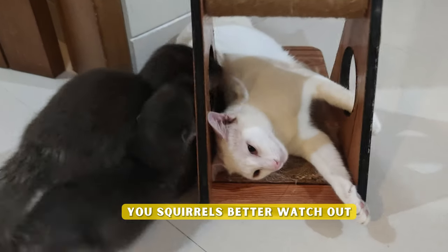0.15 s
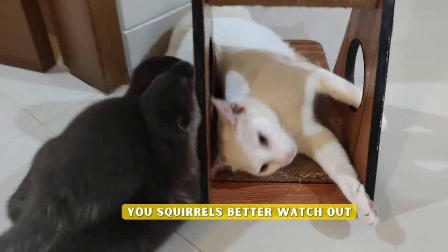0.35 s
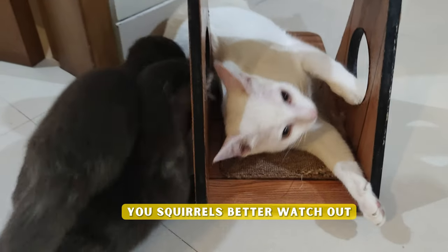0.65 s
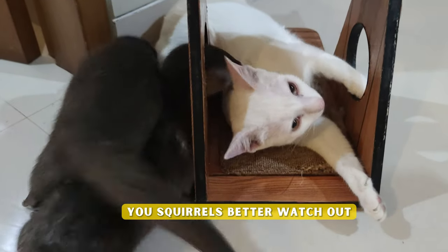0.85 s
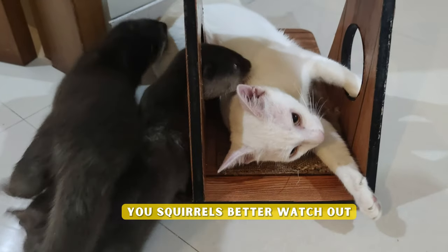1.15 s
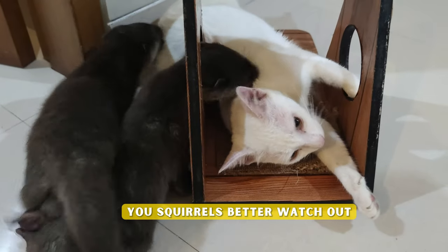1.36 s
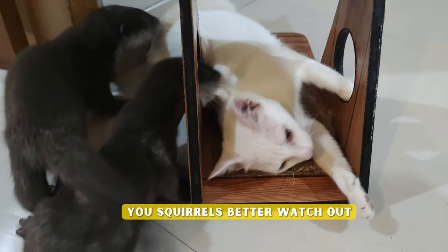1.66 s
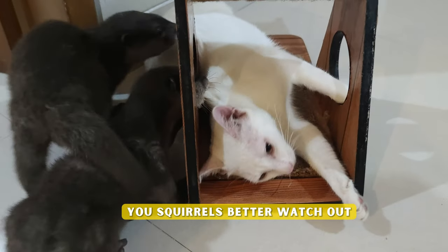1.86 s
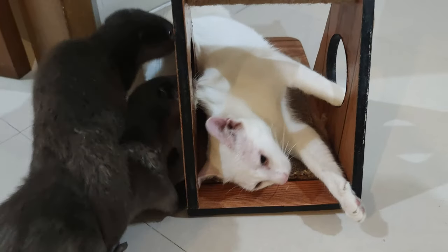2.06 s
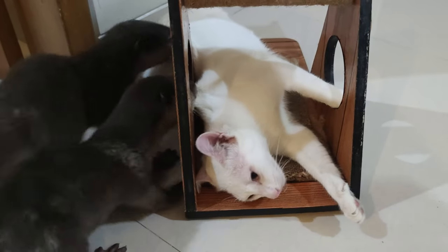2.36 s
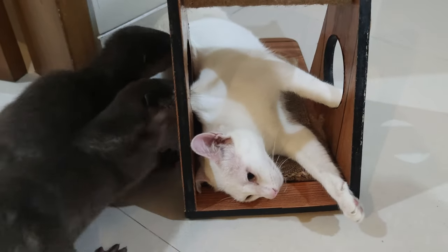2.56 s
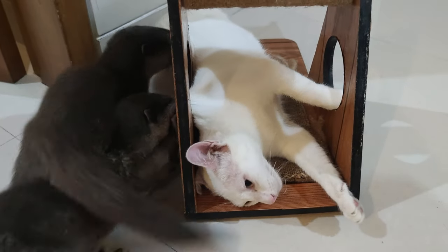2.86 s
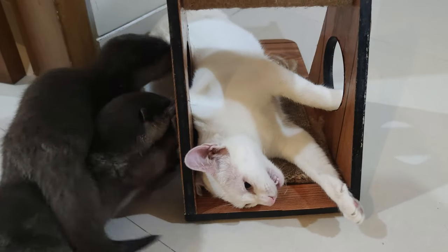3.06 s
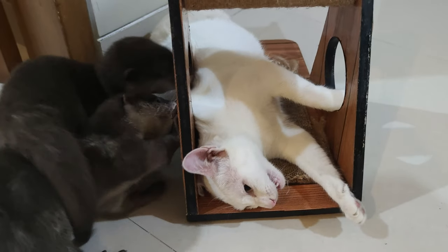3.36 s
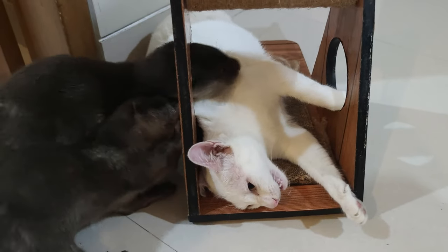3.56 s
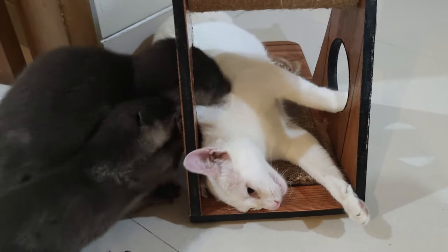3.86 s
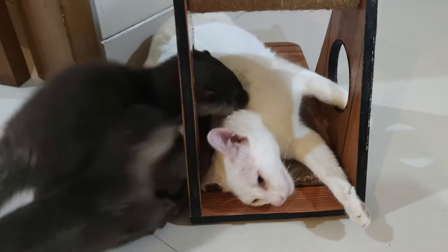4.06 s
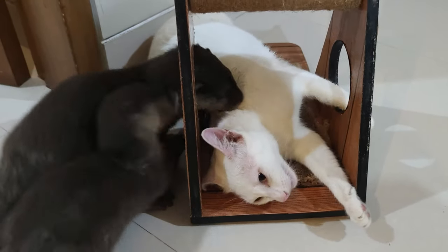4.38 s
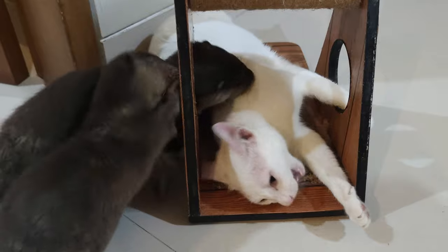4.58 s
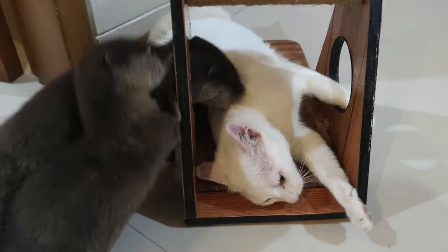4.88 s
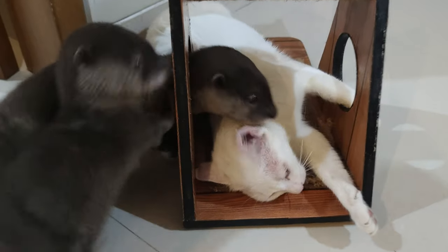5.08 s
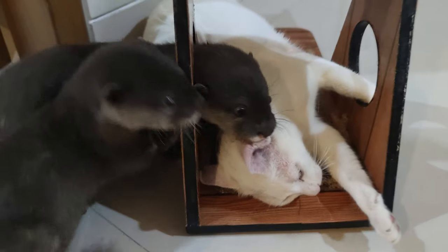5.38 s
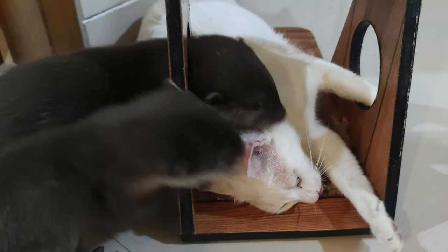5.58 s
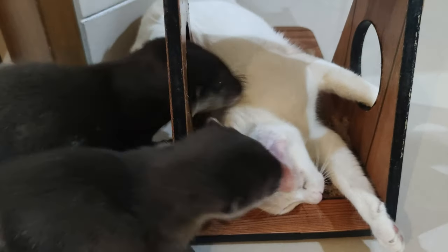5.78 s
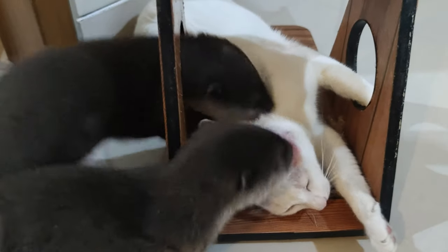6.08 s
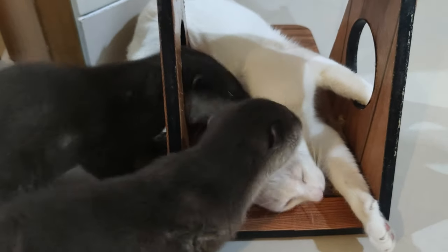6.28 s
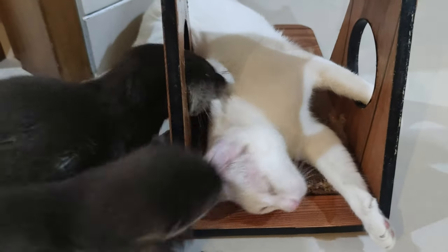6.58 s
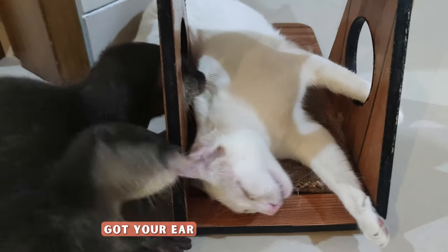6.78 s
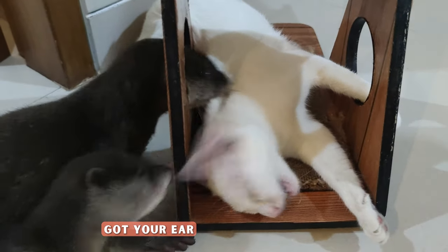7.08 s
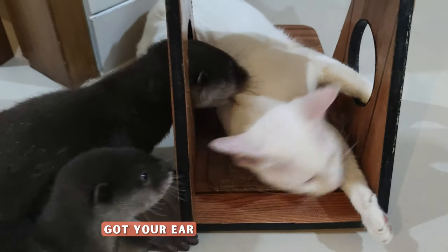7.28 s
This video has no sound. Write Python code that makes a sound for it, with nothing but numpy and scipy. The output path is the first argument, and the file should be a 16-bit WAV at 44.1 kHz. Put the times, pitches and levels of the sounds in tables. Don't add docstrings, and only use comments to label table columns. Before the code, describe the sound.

In a hard tiled room, heard by a phone a metre or two away, soft household air, low hum and a faint throbbing insect shimmer near 7.4 kHz run throughout. A faint otter chirp opens at 0 s, another at 0.2, then a sharp one at 1.3. From 1.0 to 2.0 come nasal, fluttering wheezes, a dry sniff, claw ticks and woody squeaks. Chirps at 2.2 and 2.4 surround a short raspy grunt at 2.3; another follows at 2.85. Scuffing and hollow bumps fill 3.0 to 3.4. Falling whistles of about 50 milliseconds repeat at 3.9, 4.3, 4.6, 4.9, 5.8, 6.15 (loudest) and 6.65, with little mouth pops, some airy puffs, and a ringing room tail. Chirps lean right. From 7.0 to the end at 7.4, a vigorous scuffle of rubbing, squeaking panels, ticks and low wooden thumps moves leftward.

```python
import sys
import numpy as np
from scipy import signal
from scipy.fft import rfft, irfft
from scipy.io import wavfile
from scipy.ndimage import uniform_filter1d

SR = 44100
rng = np.random.default_rng(int(sys.argv[2]) if len(sys.argv) > 2 else 0)


def gain_from_decibels(decibels):
    exponent = np.asarray(decibels, float) / 20
    return 10 ** exponent


def master(y):
    cut = np.clip(np.atleast_2d(y).T, -1, 1)
    pcm = np.round(cut * 32767)
    wavfile.write(sys.argv[1], SR, pcm.astype(np.int16))


N = 328104
T = np.arange(N) / SR
F = np.arange(N // 2 + 1) * SR / N + 1e-3

# (time [s], level [dB])
RESTLESS = [(0.0, -66.5), (.91, -70), (1.2, -104), (1.45, -57), (1.64, -54.5), (1.9, -53.5), (2.2, -58.5),
            (2.42, -51.5), (2.7, -59), (2.94, -66), (3.27, -56.5), (3.85, -61.5), (4.14, -60), (4.93, -61),
            (5.6, -61), (7.1, -61), (7.29, -49), (7.44, -64)]


def level(x, db):
    return x * gain_from_decibels(db) / np.sqrt(np.mean(x ** 2))


def on_log(hz, table):
    table_hz, values = np.transpose(table)
    return np.interp(np.log(hz), np.log(table_hz), values)


def response(hz, width, order):
    return 1 / (1 + 1j * (F - hz ** 2 / F) / width) ** order


def band(x, hz, width, order=2):
    return irfft(rfft(x) * response(hz, width, order), N)


def walk(rate):
    hold = int(SR / rate)
    steps = np.repeat(rng.standard_normal(N // hold + 1), hold)
    return 1.5 * uniform_filter1d(uniform_filter1d(steps, hold), hold)[:N]


def grains(spike_db, density):
    size_db = spike_db * np.minimum(rng.exponential(size=N), 3.5)
    return rng.standard_normal(N) * (rng.random(N) < density / SR) * gain_from_decibels(size_db)


def turn(hz):
    return 2 * np.pi * np.cumsum(hz) / SR


def narrow(hz, width):
    pole = np.exp(-np.pi * width / SR)
    slow = signal.lfilter([1], np.poly([pole] * 2), rng.standard_normal((2, N)))
    return level(np.real((slow[0] + 1j * slow[1]) * np.exp(1j * turn(hz))), 0)


def bursts(rows, db, attack, release):
    power = np.zeros(N)
    for (start, length, *_), gain_db in zip(rows, db):
        first = int(start * SR)
        t = T[first:int((start + length + 8 * release) * SR)] - start
        rise = np.clip(t / (attack * length), 0, 1)
        fall = np.exp(-np.maximum(t - length, 0) / release)
        power[first:first + len(t)] += (gain_from_decibels(gain_db) * rise * fall) ** 2
    return np.sqrt(power)


def chirps():
    # (start [s], length [s], peak [dB], where the peak falls [0-1], swell up to the peak [dB])
    calls = [(0.0, 0.02, -55, 1, -15), (0.165, 0.074, -46.5, 0.68, 2.5), (1.308, 0.056, -34, 0.91, 15),
             (2.165, 0.036, -41, 0.95, 7), (2.4, .048, -33.5, 0.74, 17.5), (2.852, 0.04, -40, 0.73, 7.5),
             (3.926, 0.042, -37, 0.66, 15), (4.291, 0.057, -36, 0.47, 5), (4.6, .038, -35.5, 0.66, 4.5),
             (4.942, 0.035, -35, 0.79, 7), (5.8192, 0.045, -34, 0.86, 10), (6.1431, 0.058, -29.5, 0.89, 9),
             (6.637, 0.042, -33.5, 0.83, 9.5)]
    # (start [Hz], drift [Hz], end [Hz], suddenness of the plunge [power], snap [Hz])
    glides = [(6500, 0, 4300, 2, 0), (6270, 4290, 5240, 1.6, 0), (6630, 1040, 5150, 4.1, 0),
              (6170, 60, 5600, 7, 0), (6230, 110, 4300, 3, 200), (6280, -550, 5700, 5, 1000),
              (6880, -2050, 3800, 8, 0), (6530, 2580, 3620, 2.9, 0), (6080, -900, 4500, 5, 0),
              (5720, -1140, 3330, 4.2, 100), (6420, -1210, 4250, 8.6, 400), (6130, 1750, 4700, 2, 650),
              (6490, -1700, 3560, 6.1, 200)]
    # (octave [dB], room share [dB], flare as the beam crosses the phone [dB])
    heads = [(-53, 1, 13), (-74.5, -0.5, 7), (-62, 0, 7.5), (-57, -0.5, 0.5), (-52.5, 7, -10), (-61, 5, 3),
             (-53.5, 4.5, 8), (-56, -7.5, -2), (-66, -1, -3), (-46, 5, 0.5), (-51.5, 1, 6), (-54.5, -5, 2),
             (-46, 3.5, 9)]
    fades = [17, 37, 26, 26, 27, 31, 26, 26, 42, 35, 21, 27, 29]
    octave_rises = [-4, -5, -10, 14, 25, 14, -4, -1, 18, 18, 10, 30, 7.5]
    octave_room = [-3.5, 2, 2.5, 7, -4.5, -2, -1.5, 1, 1, -5.5, -2, 2, -4]
    lags = [12, 11, 11, 10, 10, 10, 10, 12, 9, 11, 1, 1, 2]
    left_levels = [-8, -7, -8, -7, -7, -11, -10, -6, -8, -7, -7, -9, -9]
    # (time [s], level [dB], half width [s])
    swells = [(.17, 9, .004), (.199, -8, .003), (.206, 10, .003), (4.961, -10, .002), (1.345, 2.5, .006),
              (2.873, 7, 0.0025), (3.935, 10, 0.0024), (3.959, 2, .002), (3.965, 9, .002), (4.623, 2, .004),
              (5.84, 5.5, .006), (5.851, -9, .003), (6.175, -4, 0.0019), (6.184, 3, 0.0029),
              (6.19, -8, 0.0017)]
    attack_s, release_s, snap_s, flare_s = 0.0016, 0.0015, 0.003, 0.0045

    which = np.searchsorted([call[0] for call in calls[1:]], T + .005)
    start, length, peak_db, place, swell_db = np.array(calls)[which].T
    first, drift, last, sudden, snap = np.array(glides)[which].T
    octave_db, far_db, flare_db = np.array(heads)[which].T

    u = np.clip((T - start) / length, 0, 1)
    plunge = (first + drift - last) * u ** sudden
    hz = first + drift * u - plunge - snap * np.exp((u - 1) * length / snap_s)
    phase, shake = turn(hz), walk(150)

    rise_db = swell_db * np.maximum(1 - u / place, 0) ** 1.16
    db = peak_db - rise_db - np.array(fades)[which] * np.maximum(u - place, 0)
    waver_db = np.zeros(N)
    for s, gain_db, half in swells:
        near = slice(int((s - 3 * half) * SR), int((s + 3 * half) * SR))
        waver_db[near] += gain_db * np.exp(-((T[near] - s) / half) ** 2)
    beam_db = flare_db * np.exp(-((u - place) * length / flare_s) ** 2)
    gate = np.clip(np.minimum((T - start) / attack_s, (start + length - T) / release_s), 0, 1)

    octave_db = octave_db + np.array(octave_rises)[which] * np.minimum(u - .75, 0) + 3.5 * shake
    octave = gain_from_decibels(octave_db) * np.sin(2 * phase)
    tone = gain_from_decibels(db + waver_db + 1.5 * shake + beam_db) * np.sin(phase)
    whistle = np.sqrt(2) * gate * (tone + octave)
    late = whistle[np.maximum(np.arange(N) - np.array(lags)[which], 0)]

    usual_db = peak_db - swell_db / 2
    below, above = np.log2(np.minimum(hz / 5000, 1)), np.log2(np.maximum(hz / 5000, 1))
    steady_db = usual_db + 0.77 * (db - usual_db) + 3.4 * below - 2.1 * above
    steady = gain_from_decibels(steady_db) * np.sin(phase) + gain_from_decibels(np.array(octave_room)[which]) * octave
    far = gain_from_decibels(far_db) * np.sqrt(2) * gate * steady

    left = gain_from_decibels(np.array(left_levels)[which]) * (whistle + .3 * np.roll(whistle, 95))
    return left, late, far


def smacks():
    # (time [s], peak [dB], ring [Hz])
    pops = [(0.0186, -70, 1966), (2.207, -65, 1486), (2.899, -61.5, 1470), (3.9651, -59, 2183),
            (4.344, -64.5, 1098), (4.635, -56, 1510), (4.973, -57, 1311), (5.858, -55, 1429),
            (6.1977, -65, 1230), (6.6744, -52, 1417)]
    out, t = np.zeros(N), T[:1500]
    shape = 6 * t / 0.0021 * np.exp(1 - t / 0.0056)
    for (s, db, hz), wet in zip(pops, rng.standard_normal((len(pops), len(t)))):
        ring = np.sin(2 * np.pi * hz * t) + 1.03 * np.sin(2 * np.pi * 1.8 * hz * t)
        i = int(s * SR)
        out[i:i + len(t)] += gain_from_decibels(db) * ring * uniform_filter1d(wet, size=36) * shape
    return out


def insects():
    # (time [s], level [dB])
    loudness = [(0.0, -64.5), (0.5, -65), (1.06, -66), (1.51, -63), (3.09, -64.5), (3.44, -64),
                (3.79, -64.5), (4.08, -64.5), (6.32, -65.5), (7.19, -63), (7.44, -59)]
    # (frequency [Hz], width [Hz], level [dB])
    wing_modes = [(7486, 166, -4), (7260, 160, -9), (7030, 320, -10)]
    top_hz = 7940
    throb = 1 + 0.25 * np.sin(turn(9.7 + 0 * T) + 3.67)
    strokes = throb * (1 + 0.11 * np.sin(turn(51.0 + 0 * T) + 0.27 * walk(8.1)))
    power = sum(np.abs(gain_from_decibels(db) * response(hz, width, order=2)) ** 2 / width for hz, width, db in wing_modes)
    wings = np.sqrt(power) / (1 + (F / top_hz) ** 70)
    song = irfft(rfft(strokes * rng.standard_normal((2, N))) * wings, N)
    pan_db = np.array([[-2.2], [2.2]])
    return level(song, 7.37) * gain_from_decibels(np.interp(T, *np.transpose(loudness)) + pan_db)


def house():
    # (frequency [Hz], level per Hz [dB])
    air_colour = [(12, -37), (19, 12), (32, 1), (74, -4), (150, -9.5), (300, -6.5), (800, -11), (960, -5),
                  (1200, -17.5), (3500, -22.5), (6300, -27), (8300, -28.5), (11000, -25.5), (15700, -27)]
    # (frequency [Hz], likeness [-1 to 1])
    likeness = [(60, 0.27), (130, 0.39), (290, 0.75), (640, 0.057), (1410, -0.32), (3100, 0.21),
                (6820, -0.22), (15000, 0.13)]
    # (time [s], level [dB])
    air_swell = [(0, -1.5), (.9, -1), (1.3, 0), (2.2, 3), (2.9, 0), (3.5, 1.5), (3.75, 0), (4.1, 2),
                 (4.9, 0.5), (5.4, 1), (6, 0.5), (6.8, 1), (7.44, 2)]
    # (frequency [Hz], width [Hz], level [dB])
    hum_tones = [(208.8, 33.5, -71.5), (293.7, 17, -77.5), (558.5, 11, -82)]
    alike = np.clip(on_log(F, likeness), -.9, .95)
    noise = rfft(rng.standard_normal((2, N))) * gain_from_decibels(on_log(F, air_colour))
    mid, side = noise * np.sqrt([1 + alike, 1 - alike])
    air = level(irfft(np.array([mid + side, mid - side]), N), -60.5)
    hum = sum(gain_from_decibels(db + 0.5 * walk(8.1)) * narrow(hz + 0 * T, width) for hz, width, db in hum_tones)
    return air * gain_from_decibels(np.interp(T, *np.transpose(air_swell)) + 0.72 * walk(6.03)) + hum


def shuffle():
    # (start [s], length [s], level [dB])
    shifts = [(0.018, 0.015, -59), (0.44, 0.096, -64.5), (0.741, 0.028, -60), (1.018, 0.27, -58),
              (1.457, 1, -72), (2.27, 0.3, -60), (2.73, 0.5, -63.5), (3.11, 0.32, -61.5),
              (3.453, 0.36, -64), (4.096, 0.15, -61), (4.34, 0.016, -62), (4.593, 0.17, -64.5),
              (4.97, 0.23, -59), (5.699, 0.047, -56.5), (5.895, 0.14, -62.5), (6.195, 0.056, -60.5),
              (6.697, 0.2, -60), (6.9, 0.81, -59.5), (7.166, 0.039, -54), (7.247, 0.15, -46.5)]
    mid, side = (level(band(grains(2.0, 5000), 299, 1430, order=3), 0) for _ in range(2))
    steady = gain_from_decibels(np.interp(T, *np.transpose(RESTLESS)) - 5)
    weight = np.hypot(steady, bursts(shifts, np.transpose(shifts)[2], attack=0.22, release=0.03))
    return gain_from_decibels(-4.5) * weight * (mid + 0.54 * side * np.array([[1], [-1]]))


def rubs():
    # (start [s], length [s], level [dB], start pitch [Hz], end pitch [Hz])
    catches = [(1.467, 0.046, -58, 1776, 1540), (1.587, 0.032, -50, 1910, 1780),
               (2.203, 0.027, -52, 1507, 1462), (7.153, 0.069, -68, 2140, 2200),
               (7.398, 0.023, -54.5, 484, 452), (0.027, 0.027, -59, 1810, 1870),
               (2.021, 0.039, -53, 1435, 1400), (7.142, 0.011, -53.5, 5160, 5000),
               (7.263, 0.061, -54, 4700, 4800), (7.317, 0.038, -55, 4830, 4700),
               (1.064, 0.022, -62, 2750, 2700), (1.107, 0.033, -57, 2200, 2300),
               (1.21, 0.046, -66, 2380, 2520), (3.085, 0.013, -55, 2590, 2490),
               (3.135, 0.024, -57, 2670, 2700), (3.206, 0.077, -58, 3920, 3930),
               (3.213, 0.032, -51.5, 2830, 2850), (3.274, 0.036, -52, 2950, 2880),
               (3.281, 0.02, -58, 4430, 4330), (6.987, 0.084, -62, 2150, 2290),
               (7.115, 0.027, -53.5, 2990, 2880), (7.111, 0.022, -61, 2140, 2120),
               (7.171, 0.035, -53.5, 558, 622), (7.209, 0.016, -58, 940, 910),
               (7.234, 0.011, -54, 1240, 1200), (7.236, 0.016, -57, 2125, 2140),
               (7.258, 0.034, -52, 632, 903), (7.262, 0.018, -42.5, 2080, 2310),
               (7.28, 0.033, -55, 1410, 1320), (7.294, .022, -43, 2256, 2240),
               (7.297, 0.018, -53, 3450, 3480), (7.325, 0.036, -51, 2126, 2250),
               (7.33, 0.074, -52.5, 560, 591), (7.35, 0.021, -49.5, 3580, 3530),
               (7.372, 0.035, -48.5, 3000, 2930), (7.32, 0.037, -67, 13000, 13300),
               (7.15, .07, -58, 2920, 2860), (7.278, 0.029, -56, 956, 957), (7.14, .03, -72, 10600, 10600)]
    attack_s, release_s, grain_s = 0.0013, 0.0058, 0.002
    out, t = np.zeros(N + SR), T[:SR // 8]
    shakes = rng.standard_normal((len(catches), 2, len(t)))
    for (start, length, db, first_hz, last_hz), shake in zip(catches, shakes):
        smooth = uniform_filter1d(uniform_filter1d(shake, int(grain_s * SR)), int(grain_s * SR / 2))
        re, im = level(smooth, db)
        phase = turn(first_hz + (last_hz - first_hz) * np.minimum(t / length, 1))
        shape = np.minimum(t / attack_s, 1) * np.exp(-np.maximum(t - length, 0) / release_s)
        out[int(start * SR):][:len(t)] += shape * (re * np.cos(phase) + im * np.sin(phase))
    return out[:N]


def ticks():
    # (time [s], peak [dB], ring [Hz], treble [dB], left minus right [dB])
    taps = [(0.581, -53.5, 2650, 1, -9), (0.878, -58.5, 2340, -3, 9), (1.1508, -50.5, 2300, -24, -12),
            (2.0566, -51.5, 1600, -17, -14), (4.365, -52.5, 920, -1, 3), (5.654, -60, 940, -12, -0.5),
            (7.239, -57, 2100, -6, -4), (7.262, -57, 3000, 0, -4), (7.385, -53, 2800, -6, -8),
            (3.15, -63, 3000, -6, -6), (3.246, -58, 3020, 1, -6), (3.3, -55, 2800, -10, -1)]
    out, t = np.zeros((2, N)), T[:600]
    ring_s, crack_s = 0.00045, 0.000097
    for (s, db, hz, treble_db, pan_db), noise in zip(taps, rng.standard_normal((len(taps), len(t)))):
        ring = np.sin(2 * np.pi * hz * t) * np.exp(-t / ring_s)
        crack = gain_from_decibels(treble_db - 4) * uniform_filter1d(noise, size=4) * np.exp(-t / crack_s)
        i = int(s * SR)
        sides_db = np.array([[pan_db], [-pan_db]]) / 2
        out[:, i:i + len(t)] += gain_from_decibels(db + 16.5 + sides_db) * (ring + crack)
    return out


def wheeze():
    # (start [s], length [s], low resonance [Hz], low level [dB], upper level [dB])
    breaths = [(0.987, 0.11, 2553, -68, -59.5), (1.065, 0.12, 2470, -60.5, -49.5),
               (1.167, 0.094, 2372, -59, -53), (1.453, 0.052, 2404, -48, -48),
               (1.52, 0.065, 2396, -56, -58), (1.59, 0.022, 2440, -46, -41), (1.634, 0.12, 2420, -64, -76),
               (1.715, 0.057, 2457, -45.5, -49.5), (1.786, 0.062, 2491, -45.5, -51.5),
               (1.847, 0.067, 2425, -48.5, -73), (1.946, 0.043, 2570, -59, -81)]
    # (start [s], length [s], level [dB])
    sniffs = [
        (1.49, 0.1, -62.5),
    ]
    start, length, low_hz, low_db, up_db = np.transpose(breaths)
    waver = 1 + .009 * walk(30)
    first_breath = T < 1.4
    up_hz = 3497 + 70 * first_breath - 203 * np.clip(T - 1.55, 0, .5)

    low = gain_from_decibels(2.5 * walk(35)) * narrow(waver * np.interp(T, start + length / 2, low_hz), 180)
    low = low + gain_from_decibels(-16) * narrow(1650 * waver, 300)
    flap = 1 + 0.4 * first_breath * np.cos(turn(220 * waver ** 4))
    up = gain_from_decibels(2.5 * walk(35)) * narrow(waver * up_hz, 170) * flap

    low = low * bursts(breaths, low_db + 7, attack=0.33, release=0.011)
    up = up * bursts(breaths, up_db, attack=0.48, release=0.016)
    sniff = level(band(rng.standard_normal(N), 5900, 3500), 0)
    sniff = sniff * bursts(sniffs, [sniffs[0][2] + 9.3], attack=0.18, release=0.047)
    return low + up + sniff


def scuffle():
    # (start [s], length [s], level [dB], wood [dB], hiss [dB])
    drags = [(1.005, 0.11, -60.5, -29, -22), (1.053, 0.2, -53, -24, -17), (1.942, 0.095, -54, -11.5, 1),
             (3.085, 0.034, -65, -18, -14), (3.145, 0.026, -54, -16, -6), (3.204, 0.1, -54.5, -22, -5.5),
             (4.076, 0.067, -59.5, -5, -0.5), (5.711, 0.037, -64.5, 7, -13), (6.976, 0.1, -70.5, -18, 3.5),
             (7.108, 0.015, -50.5, -18, -16), (7.119, 0.03, -50.5, -14.5, 0),
             (7.16, 0.084, -51.5, -14, -6.5), (7.235, 0.018, -48, -4.5, -18), (7.26, 0.047, -44, -4.5, -8),
             (7.314, 0.034, -45, -10.5, -5), (7.357, 0.039, -50.5, -17, -7.5), (7.404, .03, -67, -15, -16)]
    # (frequency [Hz], width [Hz])
    surfaces = [(2510, 2070), (1064, 1400), (4700, 3500), (10400, 7400)]
    # (frequency [Hz], level [dB])
    wood_colour = [(600, -1), (850, 6), (1300, 0.5), (1500, 7), (1750, -12), (2000, 1.5), (2250, 4),
                   (3500, 4.5), (4000, 8), (5000, 3.5), (6000, 7.5)]
    db, wood_db, hiss_db = np.transpose(drags)[2:]
    slips = rfft(grains(2.3, 4000)) * gain_from_decibels(on_log(F, wood_colour))
    drag = 0
    for part_db, (hz, width) in zip([0, wood_db, hiss_db, hiss_db - 9.5], surfaces):
        gain = bursts(drags, db + part_db + 4.5, attack=0.33, release=0.0075)
        patchy = gain_from_decibels(1.8 * walk(45))
        drag = drag + gain * patchy * level(irfft(slips * response(hz, width, order=3), N), 0)
    flicker_db = 1.2 * walk(14)
    stir_db = np.interp(T, *np.transpose(RESTLESS)) - 4 + flicker_db
    stir = level(band(grains(2.1, 4000), 2200, 1660), 0) * gain_from_decibels(stir_db)
    return drag + stir


def bumps():
    # (time [s], peak [dB], ring [Hz], time to fade by 60 dB [s])
    blows = [(1.218, -48, 213, 0.079), (1.62, -47.5, 281, 0.072), (3.035, -52, 237, 0.06),
             (3.153, -47.5, 304, .06), (3.337, -42, 303, .05), (4.034, -47, 265, 0.048),
             (4.208, -45.5, 340, 0.058), (4.986, -53, 288, 0.058), (5.705, -47.5, 402, 0.043),
             (6.207, -42, 223, 0.043), (6.994, -37.5, 159, 0.031), (7.148, -41.5, 194, 0.18),
             (7.178, -41, 197, 0.14), (7.378, -39.5, 195, 0.1)]
    out, t = np.zeros(N + SR), T[:SR // 4]
    for s, db, hz, t60 in blows:
        shape = (1 - np.exp(-t / 0.002)) * np.exp(-np.log(1000) * t / t60)
        out[int(s * SR):][:len(t)] += gain_from_decibels(db) * np.sin(2 * np.pi * hz * t) * shape
    return out[:N]


def puffs():
    # (start [s], length [s], level [dB])
    hisses = [(1.345, .02, -66), (2.428, .05, -57), (3.95, .015, -66), (4.962, .025, -61),
              (5.85, .014, -55.5), (6.17, 0.034, -60), (6.665, 0.01, -64)]
    air = np.array([level(band(rng.standard_normal(N), 7600, 4900), db) for db in (-2.5, 2.5)])
    return bursts(hisses, np.transpose(hisses)[2], attack=.4, release=0.025) * air


def grunt():
    # (time [s], level [dB], pulse rate [Hz])
    voice = [
        (2.292, -68, 261.6),
        (2.304, -36.5, 264),
        (2.328, -38.5, 270),
        (2.355, -47.5, 268),
        (2.39, -53, 270),
    ]
    # (frequency [Hz], width [Hz], level [dB])
    snout_modes = [(1380, 200, -15), (2370, 430, -1), (2850, 500, 0), (3400, 450, -8), (3900, 450, -17),
                   (4600, 700, -22)]
    times, voice_db, voice_hz = np.transpose(voice)
    db, hz = np.interp(T, times, voice_db), np.interp(T, times, voice_hz)
    sounding = (T >= times[0]) & (T <= times[-1])
    gate = uniform_filter1d(1. * sounding, int(0.0046 * SR) + 1)

    cycle = np.floor(turn(hz * (1 + 0.005 * walk(150))) / (2 * np.pi))
    pulses = np.diff(cycle, prepend=0) * gain_from_decibels(-5 * (cycle % 2) + rng.standard_normal(N))
    pulses = pulses + 0.03 * rng.standard_normal(N)
    snout = 0
    for k, (mode_hz, width, mode_db) in enumerate(snout_modes):
        snout = snout + (-1) ** k * gain_from_decibels(mode_db) * response(mode_hz, width, order=3)
    return gate * gain_from_decibels(db + 4) * level(irfft(rfft(pulses) * snout, N), 0)


def room(x):
    # (frequency [Hz], time [s])
    fade_times = [(300, 0.67), (2500, 0.61), (5500, 0.64), (12000, 0.65)]
    t, tail = T[:SR // 2], 0
    for hz in 180 * 2 ** np.arange(0, 6.6, .5):
        sos = signal.butter(2, [hz / 2 ** .25, hz * 2 ** .25], "band", fs=SR, output="sos")
        noise = signal.sosfilt(sos, rng.standard_normal((2, len(t))))
        tail = tail + noise * gain_from_decibels(-60 * t / on_log(hz, fade_times))
    tail = tail * np.clip((t - .008) / 0.008, 0, 1) * (1 + 2.5 * np.exp(-t / 0.012))
    tail = tail / np.sqrt(np.mean(np.sum(tail ** 2, axis=1)))
    tail[:, int(.0105 * SR)] += [.15, .19]
    return signal.fftconvolve(x[None], tail, axes=1)[:, :N]


def scene():
    # (frequency [Hz], level [dB])
    shade = [(60, 1), (1200, -3.5), (1700, -3), (2300, -9), (5000, -10), (8000, -3), (15000, -12)]
    left, right, far = chirps()
    mouth, breath, growl, paws, clicks = smacks(), wheeze(), grunt(), scuffle(), ticks()
    background = shuffle() + insects() + house()
    near = gain_from_decibels(0.1) * rubs() + mouth + 0.74 * breath + growl + 0.78 * paws

    to_room = gain_from_decibels(-3.5) * far + gain_from_decibels(-5) * mouth + gain_from_decibels(-8) * breath
    to_room = to_room + gain_from_decibels(0.5) * growl + gain_from_decibels(-4.5) * paws + gain_from_decibels(-27) * clicks.mean(axis=0)

    closer = T > 7.05
    lag = 11
    near_right = np.where(closer, np.roll(near, lag // 4), np.roll(near, lag))
    both = np.array([near, near_right]) + room(to_room)
    both[0] = irfft(rfft(both[0]) * gain_from_decibels(on_log(F, shade)), N) * gain_from_decibels(3 * closer)
    return both + [left, right] + clicks + bumps() + background + puffs()


def low_pass(x):
    return signal.sosfilt(signal.butter(12, 15730, fs=SR, output="sos"), x)


def record(dry):
    # (frequency [Hz], level [dB])
    mic_colour = [(60, 3), (7650, 1), (8050, 2), (8900, 3), (9700, 6), (15000, 4.5)]
    mix = irfft(rfft(dry) * gain_from_decibels(on_log(F, mic_colour)), N)
    return low_pass(mix)


dry = scene()
out = record(dry)
master(out)
```